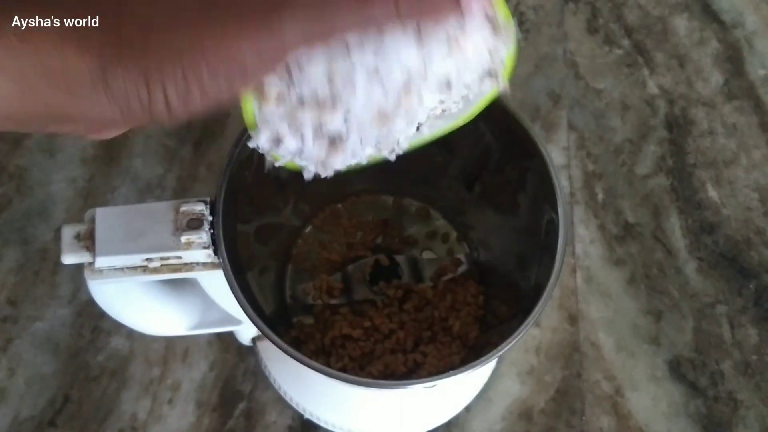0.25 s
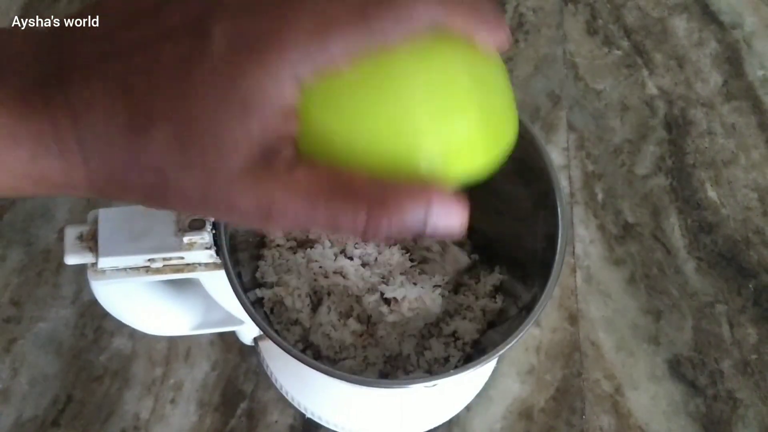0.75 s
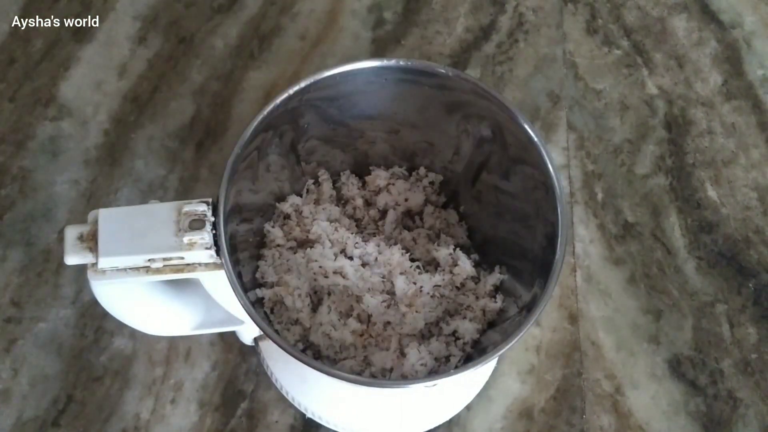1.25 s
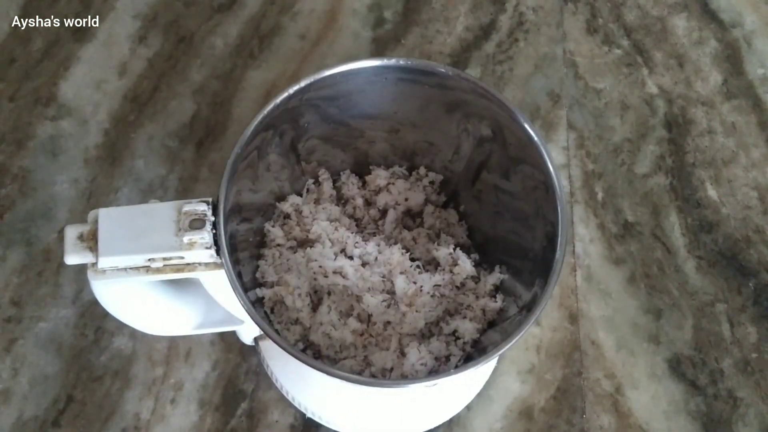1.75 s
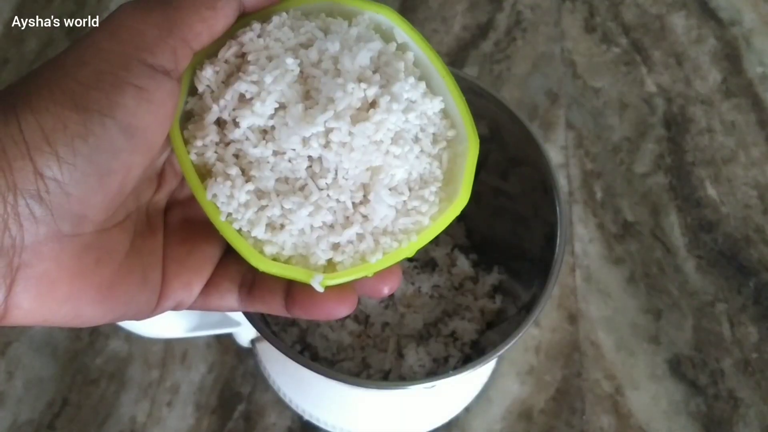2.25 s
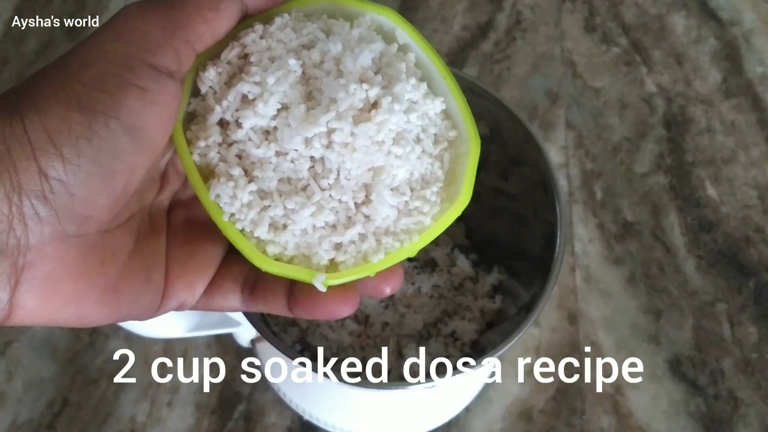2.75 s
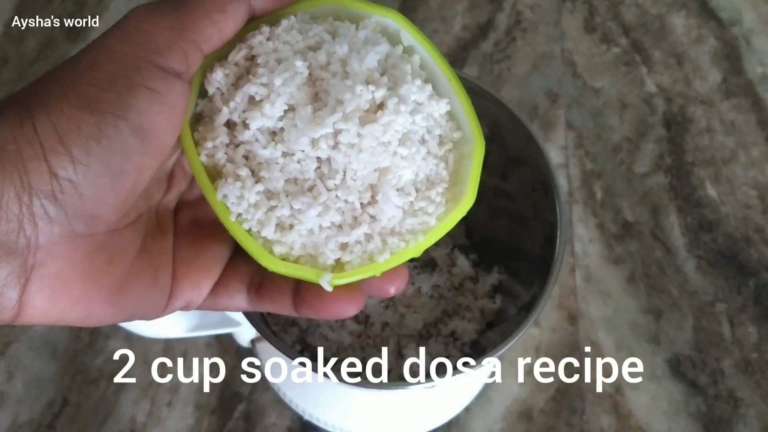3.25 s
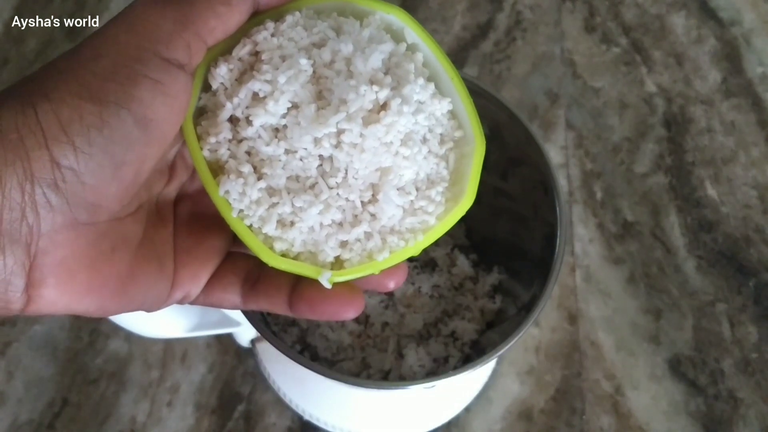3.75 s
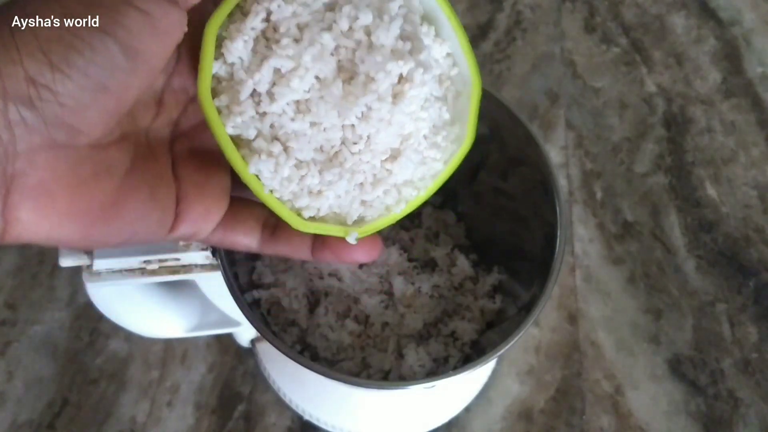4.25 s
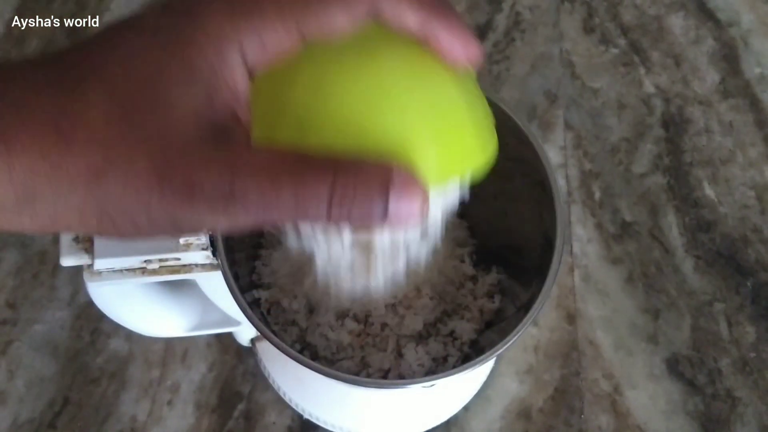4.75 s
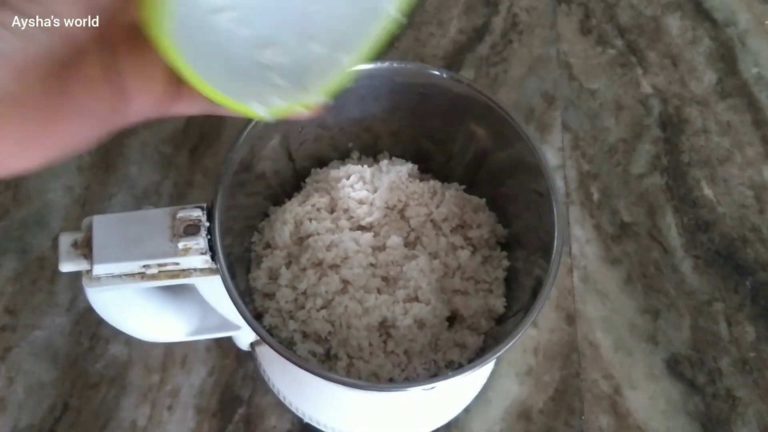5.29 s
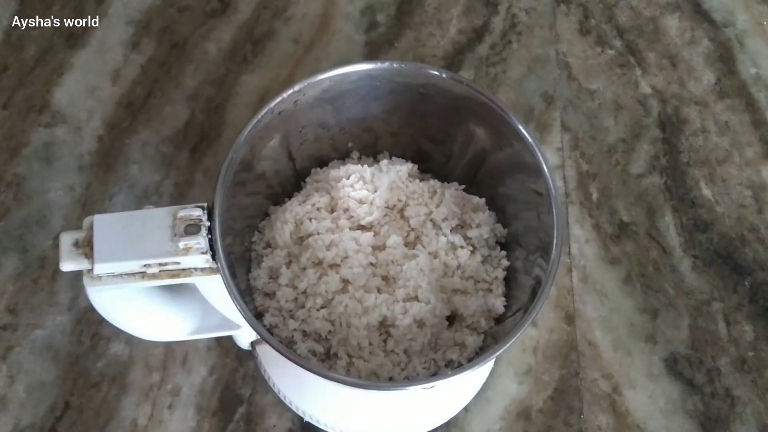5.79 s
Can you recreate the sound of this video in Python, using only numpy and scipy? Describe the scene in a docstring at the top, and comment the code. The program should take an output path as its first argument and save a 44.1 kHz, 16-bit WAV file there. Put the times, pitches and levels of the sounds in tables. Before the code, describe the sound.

Close to a phone microphone, a lump of coconut lands in a steel jar with a short, hollow plop. After a brief dropout, wet rice tumbles in, crackling for about half a second, and a cluster of knocks follows. A steady motor hum with a thin whine fills the kitchen, with scattered light ticks, faint rustling, and distant knocks, swishes and dull rumbles.

```python
"""A steel grinder jar on a kitchen counter receives a cup of grated coconut, then a cup of soaked rice.
The impact of the coconut excites the jar's modes in one hollow plop; the wet rice slides out as a crackle
of tiny pops. A motor hums and whines, sharp ticks sound, and soft knocks, swishes and rumbles reverberate
further off. A phone picks up the scene at two ports; its sound cuts out once and fades back."""
import sys
import numpy as np
from scipy import signal
from scipy.fft import rfft, irfft, next_fast_len
from scipy.io import wavfile

SR = 44100
rng = np.random.default_rng(int(sys.argv[2]) if len(sys.argv) > 2 else 0)


def dump(signal):
    """Clip the signal to [-1, 1] and save it as 16-bit WAV at the path in sys.argv[1]."""
    limited = np.clip(np.atleast_2d(signal).T, -1, 1)
    pcm = np.round(limited * 32767).astype(np.int16)
    wavfile.write(sys.argv[1], SR, pcm)


N = 265526
T = np.arange(N) / SR
PORT_LAG_S = 19 / 44100  # travel time of sound between the ports
SIDES = np.array([[.5], [-.5]])  # splits a left-right difference between the channels

# mains harmonics and motor tones: pitch_hz, level_db, left_minus_right_db
HUM_TONES = [(50, -57.5, 6), (140, -58.5, 3.5), (160.2, -56, 9), (200.6, -54, 12), (225.5, -57.5, -0.5),
             (277.5, -52.5, 2), (299.7, -56, 7.5), (346.3, -56.5, 3.5), (396.5, -60, 3.5),
             (484.5, -63.5, -3.5), (502.8, -52, 12), (594.6, -60, 5.5), (674, -73, 4), (749, -58, -1),
             (752, -52.5, 0.5), (767.5, -50, 2.5), (795.3, -50, 6), (800.5, -41.5, -0.5), (826, -50.5, 0),
             (900, -59.5, -8), (1345, -58.5, 4.5), (1938, -61.5, -9)]
# phase differences in the room's standing waves: frequency_hz, left_lead_rad
HUM_PHASE = [(50, -1.9), (160, -1.3), (240, -.6), (800, -0.34), (2000, 0.94)]
# narrow resonances, mostly stirred by the motor, plus a steady ring near 3.4 kHz: centre_hz, width_hz, level_db
WHINE_BANDS = [(130.6, 22, -58.5), (227.3, 19, -58.5), (289, 33, -52.5), (672, 74.5, -55.5),
               (759, 5.9, -52), (777.5, 7, -50), (794, 12, -52.5), (3420, 206, -58)]
# spectrum of the kitchen's air noise: frequency_hz, density_db
AIR_SPECTRUM = [(30, -100), (50, -78), (130, -79.5), (350, -75.5), (700, -74), (1000, -77.5), (1500, -76.5),
                (2100, -80.5), (2900, -90), (4200, -87), (6200, -94.5), (8200, -99.5), (10000, -103),
                (15500, -105)]
# spectral colour of handling sounds in the room: frequency_hz, gain_db
HANDLING_SPECTRUM = [(100, -6.5), (400, 8), (2000, 5.5), (3300, 3), (4300, -2), (6500, -2), (8200, -6.5),
                     (10000, -11.5), (15500, -18)]
# things slid and wiped: start_s, level_db, centre_hz, sharpness_q
ROOM_SWISHES = [(.175, -52, 5500, 1.9), (.285, -42.5, 2600, .45), (.57, -40.5, 1900, 0.43),
                (.78, -49, 4000, .45), (1.262, -43.5, 6240, 1.5), (1.592, -46.5, 4500, .6),
                (1.61, -43, 1090, 3.5), (2.76, -46.5, 4500, .9), (3.764, -44, 1900, .7),
                (4.334, -37.5, 1700, 0.46), (4.85, -38.5, 1000, 0.73)]
# things knocked and set down: start_s, level_db, centre_hz, sharpness_q
ROOM_KNOCKS = [(.212, -43, 3400, 1), (.292, -32.5, 687, 2.9), (.858, -35.5, 2520, 2.3),
               (.86, -33.5, 1090, 0.76), (1.517, -41.5, 2650, 2.6), (2.555, -47.5, 3220, 2),
               (3.153, -38, 2000, 0.73), (3.208, -34.5, 1200, 1.2), (3.267, -31, 1290, 1.4),
               (3.273, -35, 3670, 1), (3.99, -43.5, 5300, 1.7), (4.643, -39, 1700, 1.1),
               (5.356, -38.5, 3560, 0.75), (5.4, -36, 4060, 0.74), (5.43, -28, 1530, 0.69),
               (5.858, -41.5, 1900, 0.34)]
# dull rumbles in the room: start_s, level_db, centre_hz
ROOM_RUMBLES = [(3.09, -43, 130), (3.5, -49.5, 90.3), (5.52, -48, 80.4)]
# ticks and clicks at the jar and elsewhere in the kitchen: start_s, level_db, centre_hz, sharpness_q
SHARP_TICKS = [(0.2162, -35, 2990, 1), (0.545, -33.5, 5000, .8), (.5503, -26, 4470, .62),
               (.577, -40, 11000, 1.2), (1.344, -34.5, 6200, 2), (1.5192, -36, 2814, 3.7),
               (3.216, -35, 3330, 4), (3.9914, -34.5, 5860, 6.3), (4.599, -41.5, 7550, 9.2),
               (4.764, -31.5, 3500, .6), (4.776, -33, 3500, .7), (4.809, -36, 9000, .6),
               (4.853, -35.5, 9000, .5), (5.408, -27, 3800, 1)]
# spectral colour of those ticks: frequency_hz, gain_db
TICK_SPECTRUM = [(300, -8), (1500, 5), (6000, -4), (8300, -6.5), (10000, -15.5), (15500, -15)]
# modes of the struck jar: pitch_hz, level_db, t60_s
JAR_MODES = [(650, -18.5, .3), (1377, -31.5, 0.045), (1654, -23.5, 0.0394), (1940, -27.5, 0.054),
             (3277, -31, 0.034), (3300, -33, .035), (4270, -30.5, 0.031), (5130, -33.5, 0.052)]
# spectral colour of the sliding rice: frequency_hz, gain_db
RICE_SPECTRUM = [(200, -10), (900, -1), (1600, -6), (2300, -2), (3400, 3), (6000, 2), (8200, 0),
                 (10000, -6), (13000, -3.5), (15500, -13)]
# part of the opposite port subtracted from each channel: frequency_hz, share
PORT_CROSSFEED = [(1000, 0.77), (7000, 0.58), (10000, 0.46), (15500, 0.27)]
# imbalance of the channels: frequency_hz, left_minus_right_db
CHANNEL_BALANCE = [(60, -1), (250, 1.5), (550, 1), (900, -2.2), (3000, -0.5), (8000, -2.5), (13000, -3.5)]
# the dropout's gate: closing_s, closed_s, opening_s, open_s
DROPOUT_TIMES = (1.787, 1.795, 2.16, 2.19)


def undb(db):
    """Amplitude ratio of a level in decibels."""
    return 10 ** (np.asarray(db) / 20)


def unit(x):
    """Normalisation to an rms of 1."""
    return x / np.sqrt(np.mean(x ** 2))


def contour(points, hz):
    """Interpolation of (frequency_hz, value) points on a logarithmic frequency axis."""
    at, value = np.transpose(points)
    return np.interp(np.log(hz), np.log(at), value)


def shape(x, response):
    """Linear filtering: the spectrum of x is multiplied by a frequency response."""
    size = next_fast_len(x.shape[-1] + 2048)
    f = np.maximum(np.fft.rfftfreq(size, 1 / SR), 1)
    return irfft(rfft(x, size) * response(f), size)[..., :x.shape[-1]]


def resonance(f, hz, q):
    """Response of a damped oscillator, with gain 1 at its centre."""
    return 1 / (1 + 1j * q * (f / hz - hz / f))


def band(noise, hz, q, spectrum):
    """Source and filter: noise through one resonance and a spectral colour, at an rms of 1."""
    return unit(shape(noise, lambda f: resonance(f, hz, q) * undb(contour(spectrum, f))))


def coherence(f):
    """Spatial correlation of a diffuse field at the two ports: near 1 for long waves."""
    return np.sinc(2 * f * PORT_LAG_S)


def diffuse(size):
    """Diffuse field: white noise reaches the two ports from all directions."""
    mid = shape(rng.standard_normal(size), lambda f: np.sqrt((1 + coherence(f)) / 2))
    side = shape(rng.standard_normal(size), lambda f: np.sqrt((1 - coherence(f)) / 2))
    return np.array([mid + side, mid - side])


def wander(rate_hz, size=N):
    """Random modulation: interpolated Gaussian values with a spread near 1."""
    steps = np.arange(size) * rate_hz / SR
    knots = rng.standard_normal(int(steps[-1]) + 2)
    return 1.2 * np.interp(steps, np.arange(len(knots)), knots)


def decay(t, t60_s):
    """Exponential damping by 60 dB in t60_s, with gain 1 before t = 0."""
    return np.exp(-np.log(1000) * np.maximum(t, 0) / t60_s)


def add(out, start_s, x):
    """Superposition of x on out from start_s."""
    i = int(start_s * SR)
    out[..., i:i + x.shape[-1]] += x[..., :N - i]


def motor_hum(waver=.16, trim_db=-.92):
    """Beating: neighbouring mains and motor tones interfere in a flutter, and each tone wavers."""
    out = np.zeros((2, N))
    for hz, db, pan_db in HUM_TONES:
        sway = 1 + waver * (wander(rate_hz=5) + 1j * wander(rate_hz=5))
        tone = sway * np.exp(2j * np.pi * (hz * T + rng.random()))
        phase_shift = np.exp(1j * SIDES * contour(HUM_PHASE, hz))
        pan = unit(undb(pan_db * SIDES))
        out += np.sqrt(2) * undb(db + trim_db) * pan * np.real(tone * phase_shift)
    return out


def motor_whine():
    """Forced resonance: noise drives narrow peaks, the motor's whine and a steady ring near 3.4 kHz, each
    squared so that its skirts fall steeply."""
    def peaks(f):
        return sum(undb(db) * np.sqrt(2 * SR / width / np.pi) * abs(resonance(f, hz, hz / width)) ** 2
                   for hz, width, db in WHINE_BANDS)
    return shape(diffuse(N), peaks)


def kitchen_air(swell_db=.73, flicker_db=1.06):
    """Diffuse background noise: softly rushing air that swells and flickers a little."""
    air = np.sqrt(SR / 2) * shape(diffuse(N), lambda f: undb(contour(AIR_SPECTRUM, f)))
    return air * undb(swell_db * wander(rate_hz=6.3) + flicker_db * wander(rate_hz=25))


def rustle(level_db=-55, restless_db=1.5):
    """Amplitude modulation of broadband noise: a faint rustle that comes and goes."""
    wash = band(diffuse(N), hz=4500, q=.41, spectrum=HANDLING_SPECTRUM)
    return wash * undb(level_db + restless_db * wander(rate_hz=7))


def distant(db, hz, q, rise_s, t60_s, grain_db=1.6, contact_gain=.33):
    """Reverberant field: across the room, a brief contact is heard mostly as its uneven, dying tail."""
    t = T[:SR * 4 // 5]
    wash = band(diffuse(len(t)), hz, q, HANDLING_SPECTRUM)
    contact = contact_gain * decay(t, t60_s=.055)
    envelope = np.minimum(t / rise_s, 1) * (decay(t - rise_s, t60_s) + contact)
    return wash * envelope * undb(db + grain_db * wander(rate_hz=300, size=len(t)))


def kitchen_work():
    """Impact and friction: knocks start sharply and swishes softly; low rumbles swell slowly."""
    out = np.zeros((2, N))
    for start_s, db, hz, q in ROOM_KNOCKS:
        rise_s = .009 * (1300 / hz) ** .53  # softer contact is duller and rises more slowly
        add(out, start_s, distant(db, hz, q, rise_s, t60_s=.52))
    for start_s, db, hz, q in ROOM_SWISHES:
        add(out, start_s, distant(db, hz, q, rise_s=.021, t60_s=.57))
    for start_s, db, hz in ROOM_RUMBLES:
        add(out, start_s, distant(db, hz, q=2.3, rise_s=.19, t60_s=.85))
    return out


def sharp_ticks():
    """Damped transients: short, sharp ticks and clicks, at the jar and elsewhere in the kitchen."""
    out, t = np.zeros(N), T[:SR // 10]
    for start_s, db, hz, q in SHARP_TICKS:
        crack = band(rng.standard_normal(len(t)), hz, q, TICK_SPECTRUM)
        add(out, start_s, undb(db) * crack * decay(t, t60_s=.025))
    return out


def coconut_plop(start_s=.5512, push_s=.0039, free_s=.017):
    """Modal vibration: the soft lump pushes on the jar, which rings until spreading flakes damp it."""
    out, t = np.zeros(N), T[:SR // 4]
    ring = sum(undb(db) * np.sin(2 * np.pi * hz * t) * decay(t, t60_s) for hz, db, t60_s in JAR_MODES)
    choke = decay(t - free_s, t60_s=.014)
    add(out, start_s, ring * np.minimum(t / push_s, 1) * choke)
    return out


def rice_flow(start_s=4.728, peak_db=-39.5, onset_s=.02, swell_s=.12, swell_db=5, hold_s=.069):
    """Envelope of a granular flow: the rice slides, gathers until the bulk drops, holds, trickles out."""
    t = T - start_s
    onset = np.clip(1 + t / onset_s, 0, 1) ** 2
    swell = undb(peak_db - swell_db * np.clip(1 - t / swell_s, 0, 1))
    return onset * swell * decay(t - swell_s - hold_s, t60_s=.36)


def rice_crackle(bands=14, band_pops_per_s=330, top_hz=15500, top_q=8, spread_db=2.5, clump_db=1.7):
    """Shot noise: wet grains unstick in clumps of unequal pops, each ringing briefly at its own pitch."""
    pops = np.zeros(N)
    for hz in np.linspace(1000, top_hz, bands):
        sizes = undb(spread_db * np.minimum(rng.exponential(size=N), 4))
        signs = rng.choice([-1, 1], N)
        clicks = sizes * signs * (rng.random(N) < band_pops_per_s / SR)
        pops += unit(shape(clicks, lambda f: resonance(f, hz, top_q * np.sqrt(hz / top_hz))))
    flow = rice_flow() * undb(clump_db * wander(rate_hz=140))
    return flow * unit(shape(pops, lambda f: undb(contour(RICE_SPECTRUM, f))))


def near(x, far_port_db=-13, room_db=-9.5, split_hz=4000, reflection_delay_s=.004):
    """Direct and reflected sound: the source is louder at one port; the walls' treble dies away first."""
    t = T[:SR // 2]
    noise = diffuse(len(t))
    low = shape(noise, lambda f: 1 / (1 + (f / split_hz) ** 2))
    tail = low * decay(t, t60_s=.5) + (noise - low) * decay(t, t60_s=.33)
    tail *= t > reflection_delay_s
    tail /= np.sqrt(np.sum(tail ** 2) / 2)
    direct = x * unit(undb([[0], [far_port_db]]))
    return direct + undb(room_db) * signal.fftconvolve(x[None], tail, axes=1)[:, :N]


def phone_ports(pair, right_port_db=-3):
    """Differential pickup: each channel subtracts part of the other port, delayed by their spacing."""
    def crossfeed(f):
        return np.minimum(contour(PORT_CROSSFEED, f), .95) * np.exp(-2j * np.pi * f * PORT_LAG_S)

    def bass_makeup(f):
        cross = crossfeed(f)
        return (1 + abs(cross) ** 2 - 2 * cross.real * coherence(f)) ** -.5

    pair = pair * unit(undb([[0], [right_port_db]]))
    return shape(pair - shape(pair[::-1], crossfeed), bass_makeup)


def scene(gain_start_db=-2.5, gain_settle_s=.5):
    """Superposition of all sources; the hum and whine fade up slightly as the phone's gain settles."""
    settling_gain = undb(gain_start_db * np.maximum(1 - T / gain_settle_s, 0))
    foreground = near(coconut_plop() + rice_crackle() + sharp_ticks())
    room = kitchen_work() + rustle() + kitchen_air() + settling_gain * motor_whine()
    heard = phone_ports(foreground + room)
    balanced = shape(heard, lambda f: undb(contour(CHANNEL_BALANCE, f) * SIDES))
    return balanced + settling_gain * motor_hum()


def record(dry, quick_db=-20.5, quick_s=.093, slow_db=-2, recovery_s=1.09, ramp_s=.22, top_hz=15800):
    """Gating and band limiting: the sound cuts out once and fades back; the highest treble is removed."""
    _, closed_s, opening_s, _ = DROPOUT_TIMES
    gate = np.interp(T, DROPOUT_TIMES, (1, 0, 0, 1))
    since_s = np.maximum(T - opening_s, 0)
    fade_db = quick_db * np.exp(-since_s / quick_s)
    fade_db += slow_db * np.clip((recovery_s - since_s) / ramp_s, 0, 1)  # the last few dB return late
    faded = dry * gate * undb(fade_db * (T > closed_s))
    lowpass = signal.ellip(14, .2, 80, top_hz, fs=SR, output="sos")
    return signal.sosfilt(lowpass, faded)


dry = scene()
out = record(dry)
dump(out)
```